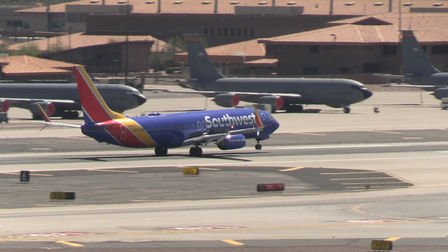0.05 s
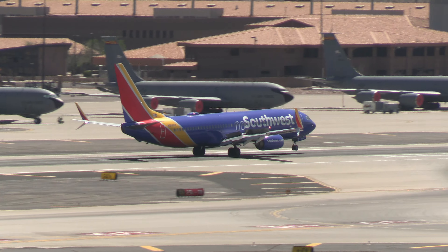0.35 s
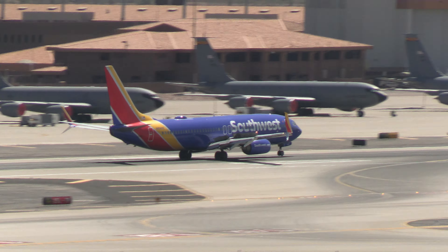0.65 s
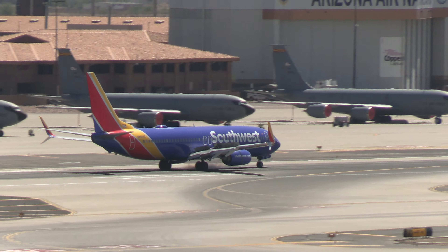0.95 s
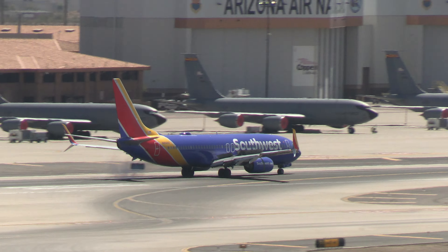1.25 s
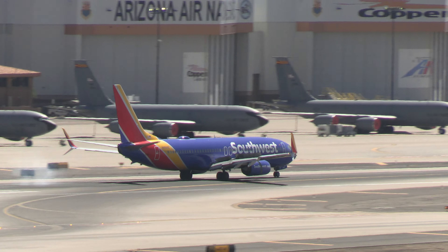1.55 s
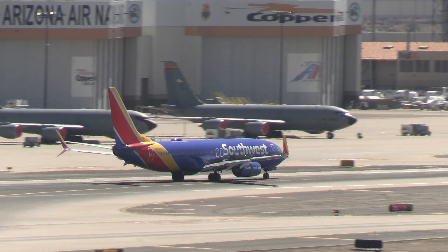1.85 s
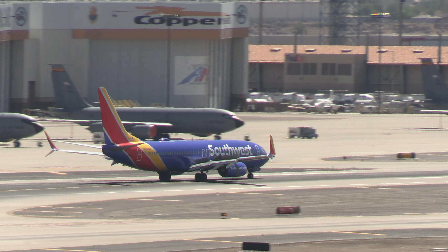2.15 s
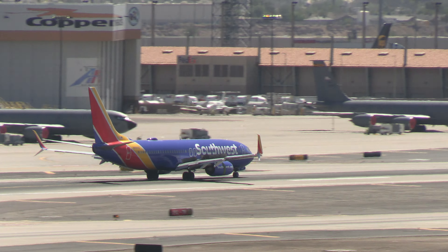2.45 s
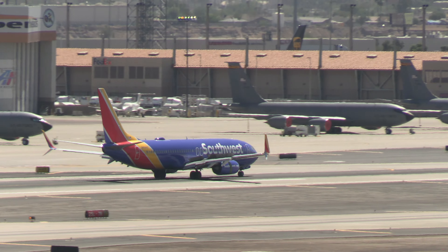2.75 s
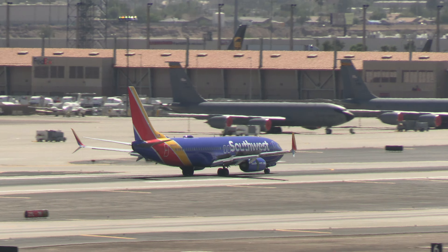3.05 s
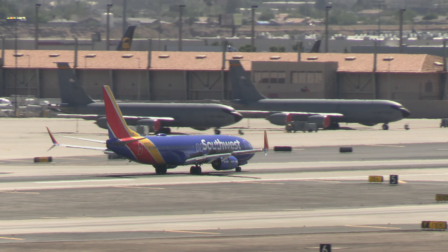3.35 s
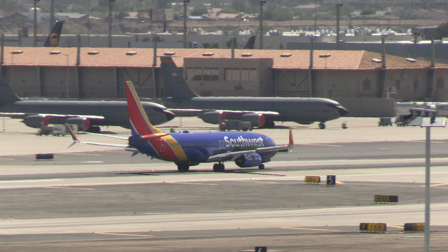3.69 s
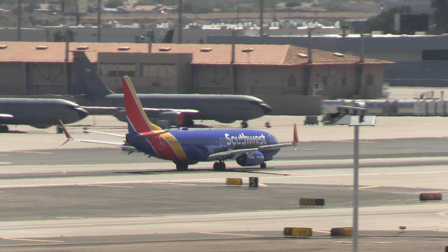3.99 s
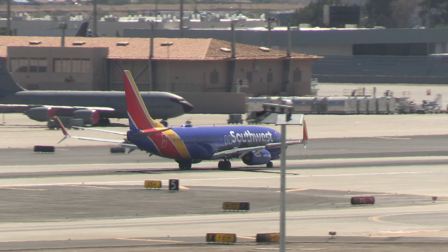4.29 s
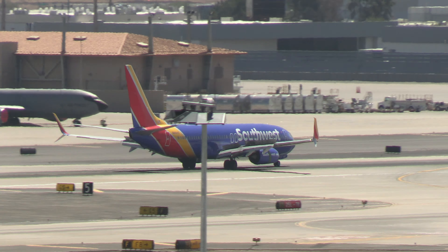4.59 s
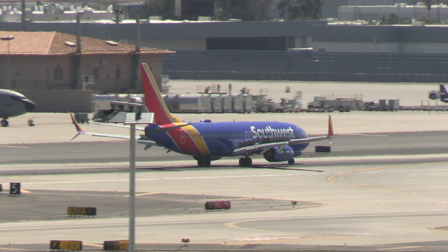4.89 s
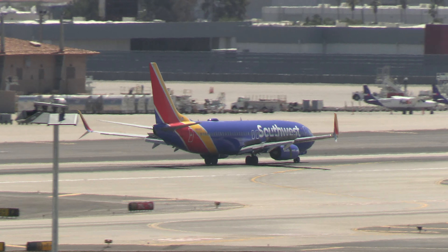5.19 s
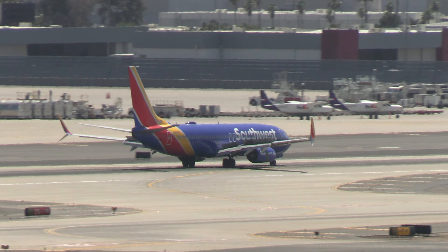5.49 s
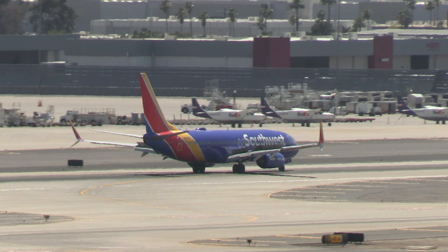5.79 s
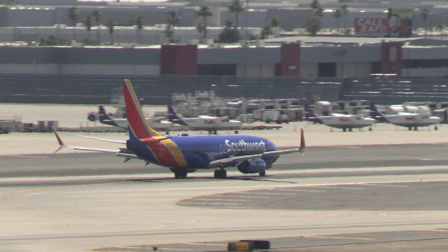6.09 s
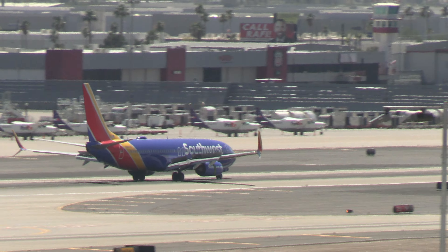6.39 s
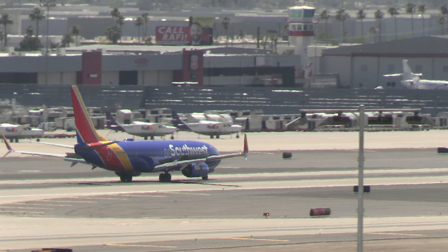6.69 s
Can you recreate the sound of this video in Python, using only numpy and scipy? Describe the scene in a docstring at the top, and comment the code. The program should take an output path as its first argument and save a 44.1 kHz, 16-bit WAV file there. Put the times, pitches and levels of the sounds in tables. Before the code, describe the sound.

Distant jet engines rumble and roar steadily as a landed airliner rolls past, with a fading whine and one sharp clack.

```python
"""Jet exhaust rumbles and roars as an airliner rolls out after landing, some hundreds of metres away.
Turbulent eddies radiate the noise; interference with its reflections sweeps a comb through the roar.
The two fans beam their whine forwards, so it fades in passing, while the turbine beams sideways.
Faint tyre chirps, a scuff, one sharp clack and two brief electric buzzes, the first faint,
sound over the hiss of air through the engines."""
import sys
import numpy as np
from scipy import signal
from scipy.fft import rfft, irfft, next_fast_len
from scipy.io import wavfile
from scipy.ndimage import uniform_filter1d, map_coordinates

SR = 44100
rng = np.random.default_rng(int(sys.argv[2]) if len(sys.argv) > 2 else 0)


def unload_audio(sound):
    """Save the sound as a 16-bit wav file, at the path given as the first command line argument."""
    columns = np.transpose(np.atleast_2d(sound))
    # keep every value between -1 and 1, then stretch to whole-number steps
    steps = np.round(np.clip(columns, -1, 1) * 32767)
    wavfile.write(sys.argv[1], SR, steps.astype(np.int16))


N = 306054


# Spectra of the exhaust's eddies, largest to smallest: f/Hz, relative level/dB
DEEP_SPECTRUM = [(4, -40), (12, 0), (22, 5), (35, 2), (48, -3), (62, 2), (120, -48.5), (400, -120)]
RUMBLE_SPECTRUM = [(25, -33), (45, -14), (58, -1), (70, -3.5), (86, -1), (106, -12.5), (170, -29.5),
                   (400, -100)]
ROAR_SPECTRUM = [(60, -29), (84, -4), (106, 1), (145, -1.5), (195, -1.5), (250, -6.5), (340, -11.5),
                 (450, -18.5), (700, -32), (1500, -88)]
RUSH_SPECTRUM = [(200, 3), (330, 1.5), (500, 0.5), (800, -1), (1050, -3.5), (1300, -8), (1800, -12),
                 (2200, -20), (3200, -30), (6000, -80)]
# Envelope of the rumble: t/s, level/dB
RUMBLE_ENVELOPE = [(0, -17), (1.2, -19.5), (2.5, -25), (3.6, -21.5), (4.35, -28.5), (6.1, -23.5),
                   (6.94, -22)]
# Envelope of the roar, loudest as the jets point at the listener: t/s, relative level/dB
ROAR_ENVELOPE = [(0, -23.5), (1.5, -21.5), (2.5, -18.3), (3.2, -22), (3.95, -18), (4.45, -19.5),
                 (5.15, -15), (6.05, -14), (6.94, -21)]
# Surges of the rush, carried over by the wind: centre t/s, gain/dB, half-width/s
WIND_SURGES = [(.85, 2.5, 0.14), (1.763, 4, 0.1), (2.885, 3, 0.13), (6.88, 2, 0.18)]

def exhaust():
    """Turbulent mixing noise: large eddies radiate a rumble, smaller ones a roar and a rush."""
    deep_db = -22.5 + arch(peak_s=3.4, rise_per_s=1.5, fall_per_s=1.5) + 0.9 * wobble(4.07)
    deep = amp(deep_db) * steadied(noise(DEEP_SPECTRUM, patchy_db=-0.8), seconds=0.89)
    rumble_db = curve(RUMBLE_ENVELOPE) + 0.89 * wobble(7)
    rumble = amp(rumble_db) * steadied(noise(RUMBLE_SPECTRUM, patchy_db=-1.5), seconds=0.31)
    roar_db = curve(ROAR_ENVELOPE) - 1.08
    swept = reflected(noise(ROAR_SPECTRUM, patchy_db=0.93))
    roar = amp(roar_db) * steadied(swept, seconds=0.21)
    rush_db = -22 + arch(peak_s=4.15, rise_per_s=1.02, fall_per_s=1.42) + 0.36 * wobble(17)
    rush_db += sum(db * gaussian(centre_s, width_s) for centre_s, db, width_s in WIND_SURGES)
    rush = amp(rush_db) * steadied(noise(RUSH_SPECTRUM, patchy_db=0.75), seconds=0.12)
    return deep + rumble + roar + rush


def reflected(direct, widest_hz=207.8, cutoff_hz=300):
    """Comb filtering: two bass-heavy reflections interfere with the direct sound; spacing = 1/delay."""
    t = clock()
    octaves = arch(peak_s=1.86, rise_per_s=0.28, fall_per_s=0.2394)  # the path difference changes
    spacing_hz = widest_hz * 2 ** octaves
    strength = 0.29 + 0.03 * t  # grows as the aircraft rolls on

    def bounce(x):
        bass = filtered(x, lambda hz: 1 / (1 + (hz / cutoff_hz) ** 4))
        return strength * np.interp(t - 1 / spacing_hz, t, bass)

    first = bounce(direct)
    return direct + first + bounce(first)


# Spectrum of the noise that turbulence scatters from the fan tones: f/Hz, relative level/dB
SKIRT_SPECTRUM = [(100, -100), (220, -27), (320, 0.5), (420, 0), (500, -3), (650, -29), (1500, -100)]

def fans(fade_db_per_s=3):
    """Directivity: two fans at slightly different speeds beam forwards, so they fade in passing."""
    whine_db = -25 - fade_db_per_s * clock() + 0.5 * wobble(4.1)
    faster = amp(whine_db) * wavering_tone(hz=436, waver_hz=3.8, flutter_db=2.4)
    slower = amp(whine_db - 2.5) * wavering_tone(hz=398.4, waver_hz=6.3, flutter_db=4.5)
    skirt = amp(whine_db - 5) * noise(SKIRT_SPECTRUM, patchy_db=0.3)
    return faster + slower + skirt


# Spectrum of the turbine's narrow band of noise: f/Hz, relative level/dB
TURBINE_SPECTRUM = [(1200, -90), (1590, -8), (1708, 0), (1780, -10), (2300, -90)]

def turbine():
    """Directivity: a band beamed sideways swells, then drops in passing; a faint whistle persists."""
    band_db = -40 + arch(peak_s=3.64, rise_per_s=3, fall_per_s=16)
    band = amp(band_db) * noise(TURBINE_SPECTRUM, patchy_db=1.2)
    whistle = amp(-63.5) * wavering_tone(hz=4150, waver_hz=6, flutter_db=1)
    return band + whistle


# Spectrum of a knock: f/Hz, relative level/dB
KNOCK_SPECTRUM = [(300, -20), (900, 4), (2000, 1), (3300, 1.5), (4500, -5), (6000, -16), (8000, -25),
                  (11000, -37), (16000, -55)]
# A soft scuff, then the two halves of a sharp clack: onset t/s, level/dB, rise time/s, T60/s
KNOCK_BURSTS = [(1.278, -31, .012, .55), (3.554, -19.5, .0003, .08), (3.564, -22.5, .001, .16)]

def knocks():
    """Non-resonant transients: bursts of broadband noise decay exponentially without ringing."""
    out = np.zeros(N)
    for onset_s, db, rise_s, t60_s in KNOCK_BURSTS:
        age = np.maximum(clock() - onset_s, 0)
        envelope = amp(db - 60 * age / t60_s) * (1 - np.exp(-age / rise_s))
        out += envelope * noise(KNOCK_SPECTRUM, patchy_db=1)
    return out


# Electric buzzes: centre t/s, peak level/dB
ELECTRIC_BUZZES = [(.586, -34), (5.202, -16.8)]

def buzzes(slow_hz=1015, fast_hz=1300, width_s=0.0068):
    """Impulse trains: sharp ticks, rich in harmonics, swell and die, repeating faster at the peak."""
    out = np.zeros(N)
    for centre_s, db in ELECTRIC_BUZZES:
        tick_hz = np.where(np.abs(clock() - centre_s) < width_s / 2, fast_hz, slow_hz)
        cycle = np.cumsum(tick_hz) / SR % 1
        samples_from_tick = (cycle - 0.5) * SR / tick_hz
        out += amp(db) * gaussian(centre_s, width_s) * np.sinc(samples_from_tick)
    return out


# Faint tyre chirps: centre t/s, f/Hz, peak level/dB, half-width/s
TYRE_CHIRPS = [(.565, 3680, -42, 0.016), (0.945, 3720, -40, 0.01), (1.302, 2110, -30.5, 0.012)]

def tyre_chirps(jitter_hz=55):
    """Friction-excited vibration: rubber slips on the runway in short, rough squeaks."""
    out = np.zeros(N)
    for centre_s, hz, db, width_s in TYRE_CHIRPS:
        phase = 2 * np.pi * np.cumsum(hz + jitter_hz * wobble(400)) / SR
        out += amp(db) * gaussian(centre_s, width_s) * np.sin(phase)
    return out


# Spectra of the hiss and the fine hiss: f/Hz, relative level/dB
HISS_SPECTRUM = [(700, -38), (1400, 0.5), (1900, 1), (2300, -0.5), (3000, -0.5), (3500, -3), (4200, -9),
                 (5000, -17.5), (6500, -28.5), (10000, -48)]
FINE_HISS_SPECTRUM = [(1500, -44), (5000, 0.5), (7000, -1.5), (9000, -2), (12000, -3), (15800, -6)]
# Their envelopes: t/s, level/dB
HISS_ENVELOPE = [(0, -39), (1.5, -36), (2.4, -39), (4.7, -37.5), (5.7, -39.5), (6.5, -39), (6.94, -35)]
FINE_HISS_ENVELOPE = [(0, -57), (.8, -53.5), (2.2, -54.5), (3.5, -53), (4.2, -54), (4.75, -52), (5.3, -55),
                      (6.2, -55), (6.94, -51.5)]

def airflow():
    """Broadband flow noise: air hisses through the engines, with a finer hiss above it."""
    hiss_db = curve(HISS_ENVELOPE) + 0.22 * wobble(19)
    hiss = amp(hiss_db) * noise(HISS_SPECTRUM, patchy_db=-0.03)
    fine_hiss = amp(curve(FINE_HISS_ENVELOPE)) * noise(FINE_HISS_SPECTRUM, patchy_db=0.9)
    return hiss + fine_hiss


def wavering_tone(hz, waver_hz, flutter_db):
    """Random modulation: a tone of rms 1, blurred in pitch and level by the air it crosses."""
    phase = 2 * np.pi * np.cumsum(hz + waver_hz * wobble(30)) / SR
    return unit(np.sin(phase) * amp(flutter_db * wobble(14)))


def noise(spectrum, patchy_db):
    """Scintillation: turbulent air lifts and fades patches of a coloured noise of rms 1."""
    white = signal.stft(rng.standard_normal(N), nperseg=1024)[2]
    patches = uniform_filter1d(rng.standard_normal(white.shape), size=8, axis=0)  # across frequency
    patches = uniform_filter1d(patches, size=9, axis=1)  # across time
    patchy = signal.istft(white * amp(patchy_db * unit(patches)), nperseg=1024)[1][:N]
    knots_hz, db = np.transpose(spectrum)
    return unit(filtered(patchy, lambda hz: amp(np.interp(np.log(hz + 1), np.log(knots_hz), db))))


def steadied(x, seconds):
    """Division by the running rms evens out the slow swells of a noise; the result has rms 1."""
    power = np.abs(uniform_filter1d(x ** 2, size=int(seconds * SR)))
    smooth_power = uniform_filter1d(power, size=int(seconds * SR / 2))
    return unit(x / np.sqrt(smooth_power + 1e-9))


def filtered(x, response):
    """Linear filtering: the spectrum of x is multiplied by a frequency response."""
    size = next_fast_len(N + SR // 2)
    hz = np.fft.rfftfreq(size, 1 / SR)
    return irfft(rfft(x, size) * response(hz), size)[:N]


def wobble(rate):
    """Spline interpolation through random knots, rate of them a second."""
    knots = rng.standard_normal(int(N * rate / SR) + 4)
    return map_coordinates(knots, [clock() * rate])


def arch(peak_s, rise_per_s, fall_per_s):
    """A linear rise to 0 at the peak, then a linear fall."""
    t = clock() - peak_s
    return np.minimum(rise_per_s * t, -fall_per_s * t)


def gaussian(centre_s, width_s):
    """A Gaussian pulse of height 1 and standard deviation width_s."""
    return np.exp(-((clock() - centre_s) / width_s) ** 2 / 2)


def curve(rows):
    """Linear interpolation of (t, level) rows at every sample."""
    return np.interp(clock(), *np.transpose(rows))


def clock():
    """The time of every sample."""
    return np.arange(N) / SR


def amp(db):
    """Decibels to amplitude ratio."""
    return 10 ** (np.asarray(db) / 20)


def unit(x):
    """Normalisation to rms 1."""
    return x / np.sqrt(np.mean(x ** 2) + 1e-20)


def scene():
    """Superposition: the engines and the brief events add in one channel."""
    engines = exhaust() + airflow() + fans() + turbine()
    return (engines + knocks() + tyre_chirps() + buzzes())[None]


def record(dry, top_hz=15820):
    """Band limiting: an ideal low-pass filter removes the highest treble."""
    return filtered(dry[0], lambda hz: hz < top_hz)[None]


dry = scene()
out = record(dry)
unload_audio(out)
```